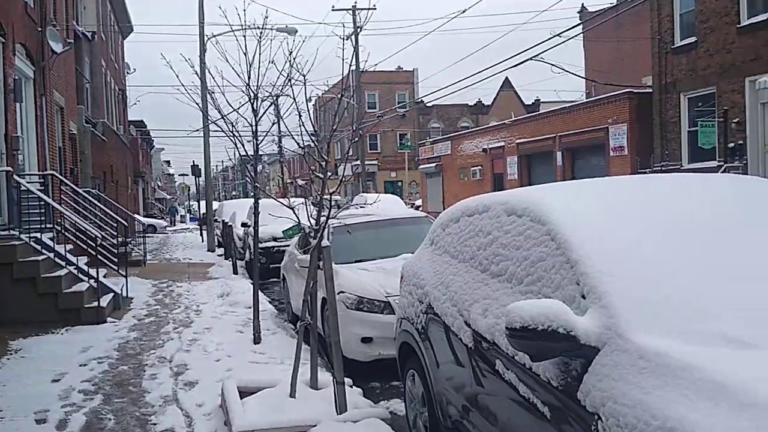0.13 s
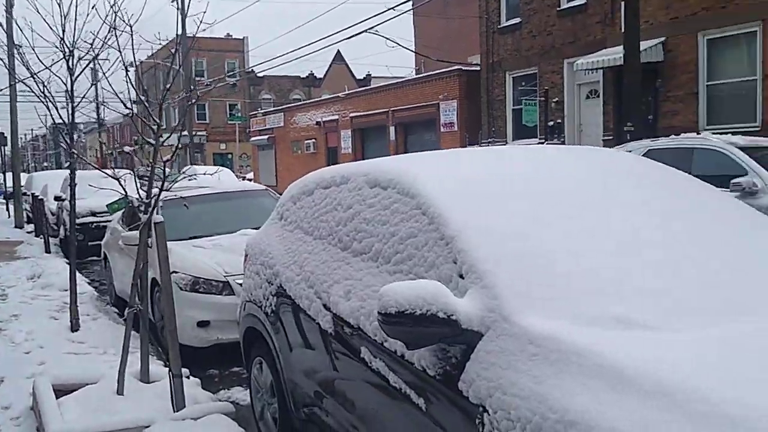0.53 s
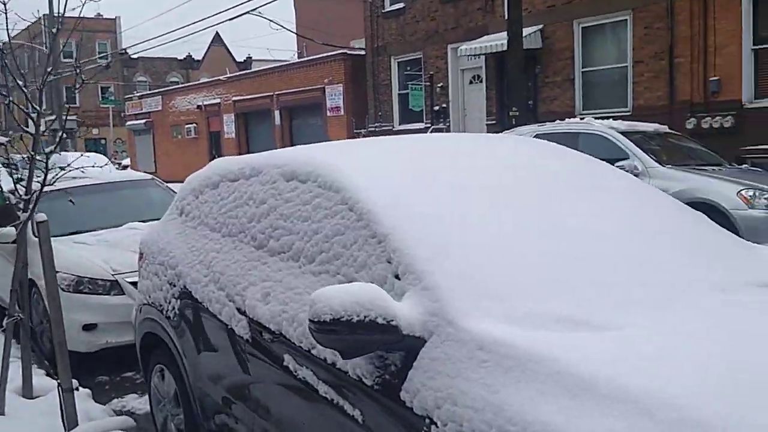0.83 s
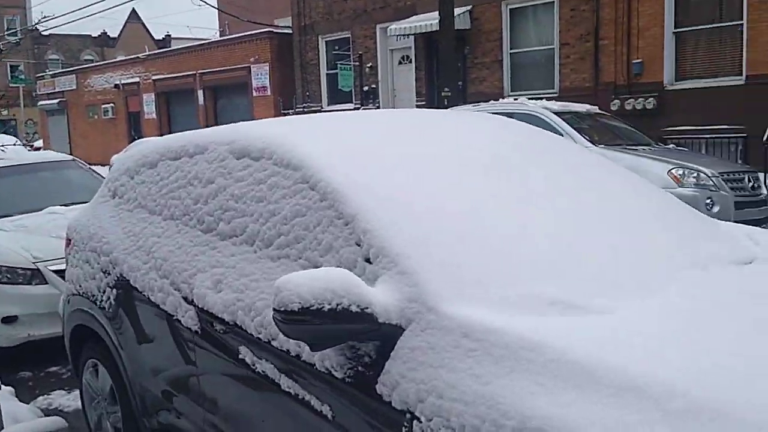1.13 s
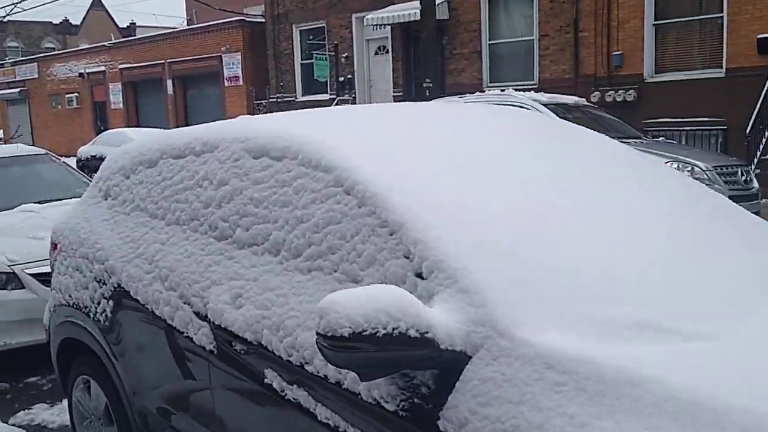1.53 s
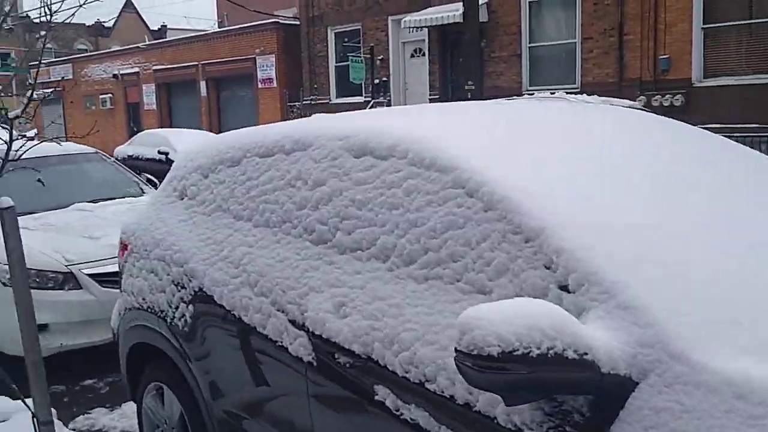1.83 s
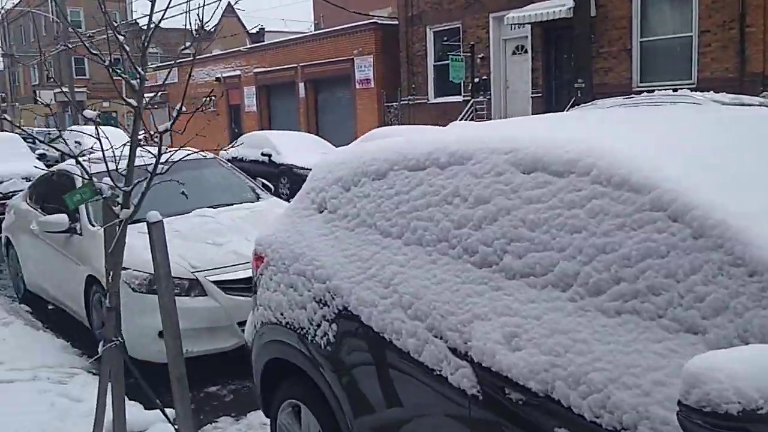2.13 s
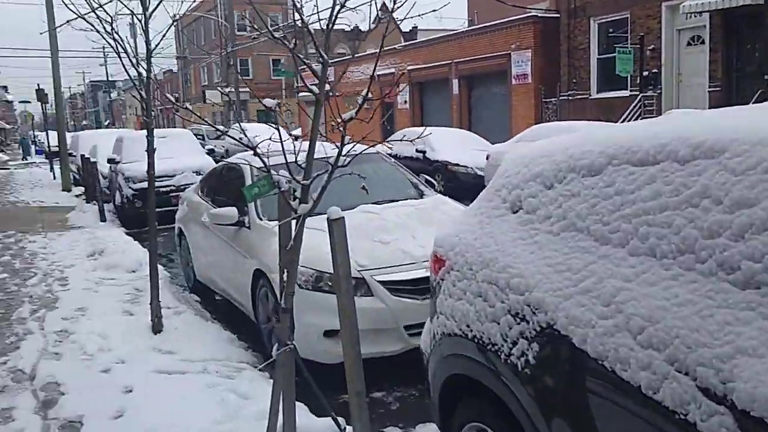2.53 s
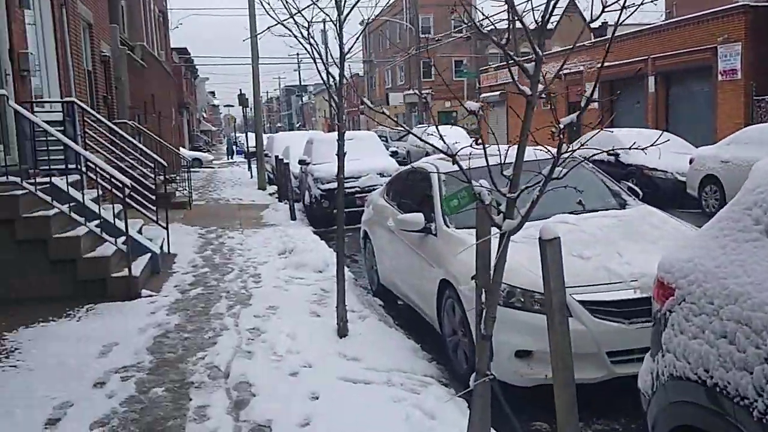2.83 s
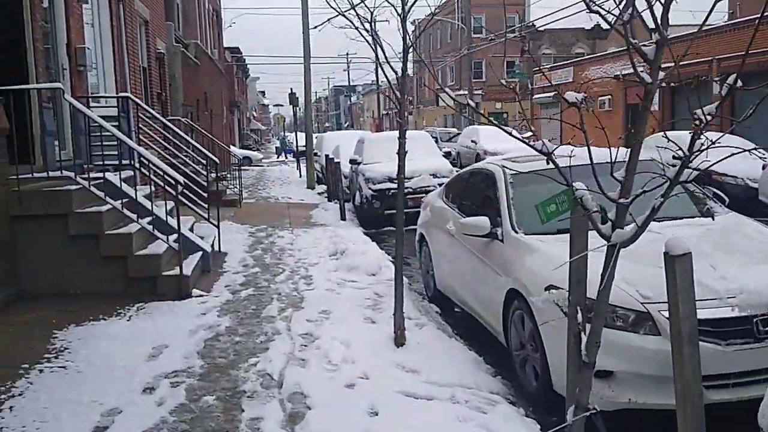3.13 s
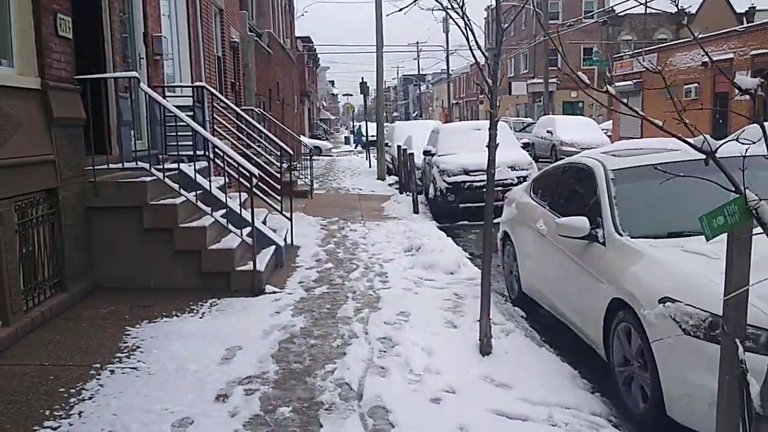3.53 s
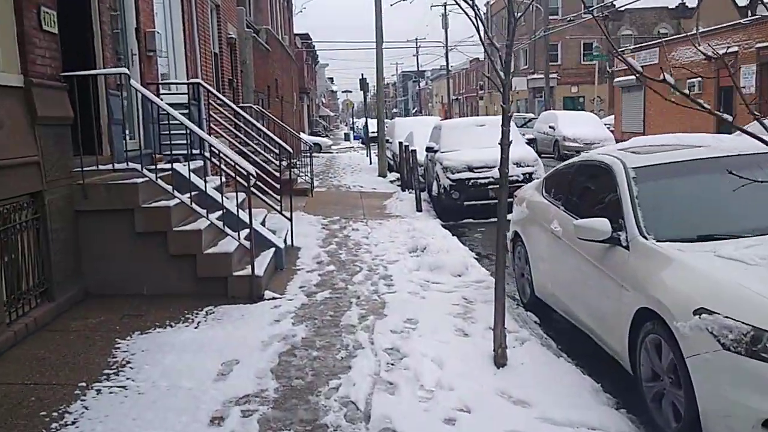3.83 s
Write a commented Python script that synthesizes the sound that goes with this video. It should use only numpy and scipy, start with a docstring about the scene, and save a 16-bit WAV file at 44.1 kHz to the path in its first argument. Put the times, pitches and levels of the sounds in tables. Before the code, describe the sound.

Footsteps crunch through wet snow close to the microphone, seven steps in four seconds, each with a fine sizzle and small snaps. Distant traffic rumbles throughout. Wind buffets mainly the right side, with low thumps from about 1.3 to 3.4 seconds. Sparrows chirp faintly on the right at 0.2 and 1.2 seconds, and one scolds from 3.4 to 3.8 seconds. Clothing rustles very faintly between steps.

```python
"""A city pavement in wet snow, boots close to a stereo pair. From the start far traffic rumbles and
wind buffets mainly the right microphone. Someone takes seven steps in four seconds: each heel splashes
into the crystals, the sole rolls on with a fine sizzle, and the packed snow crunches and snaps.
Sparrows chirp after the first step and around the third; from then on single eddies thump the
microphone, and near the end a sparrow scolds."""
import sys
import numpy as np
from scipy import signal
from scipy.fft import rfft, irfft
from scipy.io import wavfile
from scipy.ndimage import uniform_filter1d

SR = 44100
rng = np.random.default_rng(int(sys.argv[2]) if len(sys.argv) > 2 else 0)


def generate_wav(signal):
    """Clip the signal to [-1, 1] and save it as 16-bit WAV at the path in sys.argv[1]."""
    frames = np.transpose(np.atleast_2d(signal))
    scaled = np.clip(frames, -1, 1) * 32767
    pcm = np.round(scaled).astype(np.int16)
    wavfile.write(sys.argv[1], SR, pcm)


N = 176400
T = np.arange(N) / SR
BIN_HZ = np.arange(N // 2 + 1) * SR / N
SNOW_TOP_HZ, WIND_LEFT_DB, BIRD_PAN_DB = 2230, -21.5, -9.5

# The footfalls. Each row: start in seconds, heel level in dB, sole delay and hold in seconds,
# sole level and its fade over the hold in dB, release in seconds, treble tilt in dB.
STEPS = [(0.017, -46.5, 0.017, 0.083, -48.5, 3, 0.057, 5.5),
         (0.567, -54.5, 0.037, .17, -45.5, 6, 0.016, 2.5),
         (1.306, -50.5, 0.035, 0.026, -50.5, -0.5, .065, 2.5),
         (1.869, -37.5, 0.023, 0.021, -38, 2.5, 0.051, 3), (2.55, -47, 0.044, 0.015, -48, 0.5, 0.053, 0.5),
         (3.1324, -36.5, 0.062, .1, -47.5, 3.5, 0.02, 2),
         (3.818, -48.5, 0.018, 0.052, -46.5, 1.5, 0.052, 2.5)]
# Where close and far sounds sit across the pair. Each row: frequency in Hz, left minus right in dB.
CLOSE_BALANCE = [(500, 0), (2000, -5), (3300, -1), (5500, -10.5), (7500, -9), (9500, -4), (12000, 4),
                 (15000, 13)]
FAR_BALANCE = [(80, -2.5), (500, 3), (2000, -4.5), (3300, -2.5), (5500, -5.5), (9000, 0), (14000, 6.5)]


def from_db(db):
    """Decibels to gain."""
    return 10 ** (np.asarray(db) / 20)


def rms_one(x):
    """Scale to unit power."""
    return x / np.sqrt(np.mean(x ** 2) + 1e-20)


def pan(db):
    """Left and right gains for a level difference."""
    return from_db(np.array([[.5], [-.5]]) * db)


def in_time(rows):
    """A curve at every sample."""
    return np.interp(T, *np.transpose(rows))


def per_bin(points):
    """A table over log frequency at every spectral bin."""
    hz, values = np.transpose(points)
    return np.interp(np.log(BIN_HZ + 1), np.log(hz), values)


def coloured(x, points):
    """Causal (minimum-phase) filter with the given colour and unit power gain."""
    cepstrum = irfft(np.log(rms_one(from_db(per_bin(points)))), N)
    fold = np.concatenate([[1], np.full(N // 2 - 1, 2), np.zeros(N // 2)])
    return irfft(rfft(x) * np.exp(rfft(cepstrum * fold)), N)


def balanced(x, points):
    """Share each frequency between the two microphones, keeping the power."""
    gains = pan(per_bin(points))
    return irfft(rfft(x) * gains / np.sqrt(np.mean(gains ** 2, axis=0)), N)


def envelope(start, attack, hold, release, fade_db=0):
    """Straight attack, hold sinking by fade_db, exponential release; times in seconds."""
    t = T - start
    rise = np.clip(t / attack, 0, 1)
    sink = from_db(-fade_db * np.clip((t - attack) / hold, 0, 1))
    return rise * sink * np.exp(-np.clip((t - attack - hold) / release, 0, 20))


def grains(per_s, spread_db, size=N):
    """Random clicks of uneven size, unit power."""
    sizes = from_db(spread_db * np.minimum(rng.exponential(1, size), 4))
    return rms_one(sizes * rng.choice([-1, 1], size) * (rng.random(size) < per_s / SR))


def lowpass(x, hz):
    """Second-order low-pass."""
    return signal.sosfilt(signal.butter(2, hz, fs=SR, output="sos"), x)


def street():
    """Far traffic: a rumble common to both microphones under diffuse hiss."""
    # The traffic's spectrum. Each row: frequency in Hz, relative level in dB.
    colour = [(25, -18), (45, 5.5), (75, 10), (110, -0.5), (200, -5.5), (400, -8), (700, -10.5),
              (1200, -17.5), (2000, -13), (2700, -20), (4000, -21), (5500, -30.5), (8500, -38),
              (13000, -33.5), (15800, -39)]
    # How alike the microphones hear it. Each row: frequency in Hz, left-right correlation.
    likeness = [(60, 0.73), (300, 1), (700, 0.43), (1500, 0), (3000, 0.031), (15000, 0.19)]
    # Its rise and fall. Each row: time in seconds, level in dB.
    level = [(0, -50), (.4, -53), (.9, -51.5), (1.12, -55), (1.5, -51.5), (1.85, -53), (2.2, -53.5),
             (2.5, -51), (2.9, -51), (3.4, -51), (3.75, -58), (4, -51)]
    mid, side = rfft(rng.standard_normal((2, N)))
    alike = per_bin(likeness)
    air = irfft(np.sqrt(1 + alike) * mid + np.sqrt(1 - alike) * side * [[1], [-1]], N)
    return from_db(in_time(level)) * rms_one(balanced(coloured(air, colour), FAR_BALANCE))


def wind():
    """Slow eddies at each microphone port, and faster buffeting in the gusts."""
    # Spectra of the slow and the fast eddies. Each row: frequency in Hz, relative level in dB.
    slow_colour = [(20, -26.5), (32, -55), (48, -7), (62, -2.5), (80, 0.5), (115, -6.5), (170, -14.5),
                   (250, -31.5), (500, -37.5), (1500, -70)]
    fast_colour = [(40, -13.5), (90, 2), (140, 0.5), (200, 1), (300, -7.5), (450, -24.5), (900, -25.5),
                   (3000, -61.5)]
    # Their strength as gusts pass. Each row: time in seconds, relative level in dB.
    slow_level = [(0.0, -39.5), (0.21, -41.5), (0.33, -69), (0.56, -42.5), (0.66, -59), (0.71, -40),
                  (1.15, -58), (1.2, -41.5), (1.28, -59), (1.31, -43), (1.44, -41), (1.47, -69),
                  (1.49, -48.5), (1.77, -44.5), (1.78, -50.5), (1.89, -35.5), (2.08, -42), (2.1, -49.5),
                  (2.88, -38), (3.01, -48.5), (3.17, -43), (3.45, -41.5), (3.51, -61), (3.81, -84),
                  (3.89, -52), (4.0, -51)]
    fast_level = [(0.0, -44), (0.39, -87), (0.6, -48), (1.26, -79), (1.35, -44), (1.45, -61), (1.57, -47.5),
                  (1.67, -69), (1.7, -46), (1.8, -60), (1.83, -42.5), (1.94, -44), (2.08, -47.5),
                  (2.12, -64), (2.82, -44.5), (2.91, -46.5), (2.99, -63), (3.01, -55), (3.09, -62),
                  (3.38, -45), (3.51, -71), (3.77, -90), (3.95, -51), (4.0, -68)]
    boost_db, steady_s = 5, 0.0522
    out = 0
    for colour, level in ((slow_colour, slow_level), (fast_colour, fast_level)):
        eddies = coloured(rng.standard_normal((2, N)), colour)
        running_rms = np.sqrt(uniform_filter1d(eddies ** 2, int(steady_s * SR), axis=1) + 1e-9)
        out += from_db(in_time(level) + boost_db) * eddies / running_rms
    return out * from_db([[WIND_LEFT_DB], [0]])


def sizzle():
    """Wet crystals burst under the heel, then under the rolling sole."""
    # The bursting crystals' spectrum. Each row: frequency in Hz, relative level in dB.
    colour = [(150, -15), (500, 0), (1400, -9), (2000, 6.5), (2600, -4.5), (3400, 2), (4400, -1.5),
              (5500, -1.5), (7300, -3), (8700, -9.5), (12000, -6), (15500, -7.5)]
    # A boot briefly brushes the snow. Each row: start in seconds, level in dB.
    brushes = [(1.179, -63.5), (1.822, -61.5), (1.978, -79), (2.05, -62), (3.009, -45.5)]
    contact_s, shortest_swell_s = 0.0049, 0.022
    clump_db, clump_hz, tilt_hz = 2.1, 87, 8400
    crystals = np.array([grains(per_s=5000, spread_db=2) for _ in range(2)])
    crystals = rms_one(crystals + 0.91 * rng.standard_normal((2, N)))  # hiss smooths the clicks
    clumps = rms_one(from_db(clump_db * rms_one(lowpass(rng.standard_normal(N), clump_hz))))
    fine = balanced(coloured(crystals * clumps, colour), CLOSE_BALANCE)
    dull = irfft(rfft(fine) / (1 + (BIN_HZ / tilt_hz) ** 4), N)
    treble = fine - dull
    out = fine * sum(from_db(db) * envelope(start, contact_s, hold=0.0043, release=0.0013)
                     for start, db in brushes)
    for start, heel_db, delay, hold, sole_db, fade_db, release, tilt_db in STEPS:
        heel = from_db(heel_db) * envelope(start, contact_s, hold=0.011, release=0.008)
        swell = max(delay, shortest_swell_s)
        sole = from_db(sole_db) * envelope(start, swell, hold, release, fade_db)
        sole *= np.clip((T - start) / swell, 0, 1)  # a second ramp eases the sole in
        tilted = dull * from_db(-tilt_db / 2) + treble * from_db(tilt_db / 2)
        out += np.hypot(heel, sole) * tilted
    return out


def stray_crystals():
    """Lone ice crystals crack while the snow settles under each step."""
    # The cracks' spectrum. Each row: frequency in Hz, relative level in dB.
    colour = [(500, -27), (2000, 12), (4000, -5), (7000, -1), (9000, -2), (13000, 3), (15500, 8.5)]
    below_sole_db = 17
    level = sum(from_db(sole_db - below_sole_db) * envelope(start, delay, hold, release=0.099)
                for start, _, delay, hold, sole_db, *_ in STEPS)
    cracks = np.array([grains(per_s=130, spread_db=4) for _ in range(2)])
    return balanced(coloured(level * cracks, colour), CLOSE_BALANCE)


def fractures(hz, size):
    """Random fractures in the snow, each ringing a few cycles at a pitch near hz; unit power."""
    per_s, pitch_count, pitch_ratio = 1500, 7, 1.53
    ring_cycles = 8.9  # to fall 60 dB
    out = 0
    for pitch in hz * np.geomspace(1 / pitch_ratio, pitch_ratio, pitch_count):
        radius = from_db(-60 * pitch / (ring_cycles * SR))
        angle = 2 * np.pi * pitch / SR
        clicks = grains(per_s / pitch_count, spread_db=2, size=size) + 1e-18
        out += signal.lfilter([1, 0, -1], [1, -2 * radius * np.cos(angle), radius ** 2], clicks)
    return rms_one(lowpass(out, SNOW_TOP_HZ))


def crunch():
    """Coarse fractures run through the snow as it packs, amid duller crumbling."""
    # Snow packs under the weight, mostly higher in pitch as a step goes on.
    # Each row: middle of the swell in seconds, length in seconds, level in dB, pitch in Hz.
    packings = [(0.02, .13, -57, 1370), (0.68, 0.036, -49.5, 990), (0.736, 0.0062, -46.5, 1390),
                (0.754, 0.019, -45, 1410), (1.342, 0.054, -53.5, 1050), (1.873, 0.026, -48.5, 1410),
                (1.919, 0.097, -56, 1360), (2.587, 0.067, -50.5, 1440), (3.184, 0.011, -46, 700),
                (3.205, .04, -51, 1180), (3.257, 0.044, -57, 1280), (3.85, 0.028, -47.5, 810),
                (3.884, 0.033, -49, 1380), (3.936, 0.038, -48.5, 1700)]
    # The crumbling's spectrum. Each row: frequency in Hz, relative level in dB.
    colour = [(100, -33), (300, 3.5), (450, 4.5), (750, -14.5), (1300, -6.5), (1900, 0.5), (2300, -10.5),
              (2800, -10), (4500, -22.5), (9000, -46)]
    swell_share, mid_db, side_db = 0.34, -5, -7.5
    creak, load = 0, 0
    for onset, length, db, hz in packings:
        swell = swell_share * length
        weight = from_db(db) * envelope(onset - swell / 2, swell, length - swell / 2, release=0.0077)
        creak += weight * np.resize(fractures(hz, size=SR // 4), N)
        load += weight
    mid, side = rng.standard_normal((2, N))
    crumbs = from_db(mid_db) * mid + from_db(side_db) * side * [[1], [-1]]
    return pan(db=-0.5) * (creak + coloured(load * crumbs, colour))


def chirps():
    """Sparrows off to the right give arched, falling chirps."""
    # The calls. Each row: start and length in seconds, pitch and its fall in Hz, level in dB.
    calls = [(0.201, .045, 4120, 150, -62.5), (0.213, 0.046, 5450, 302, -68),
             (.24, 0.048, 3690, 204, -66.5), (1.2, 0.035, 5540, 100, -69), (1.226, 0.036, 5350, 350, -71)]
    arch_hz, wobble_hz = 257, 147
    out = 0
    for start, length, hz, fall_hz, db in calls:
        progress = np.clip((T - start) / length, 0, 1)
        arch = np.sin(np.pi * progress)
        wobble = rms_one(lowpass(rng.standard_normal(N), hz=600))
        pitch = hz - fall_hz * progress + arch_hz * (arch - .5) + wobble_hz * wobble
        out += from_db(db) * np.sqrt(2) * arch * np.sin(2 * np.pi * np.cumsum(pitch) / SR)
    return pan(BIRD_PAN_DB) * out


def knock(t, hz, cycles):
    """A damped ring that falls 60 dB in the given number of cycles."""
    return np.sin(2 * np.pi * hz * t) * from_db(-60 * np.minimum(t * hz / cycles, 2))


def snaps():
    """A lump of snow breaks: its own knock, the boot's under it, and a short crumbling tail."""
    # Single lumps give way. Each row: start in seconds, relative level in dB, pitch in Hz.
    breaks = [(.583, -24.5, 1110), (.742, -32, 1350), (0.77, -32, 1410), (1.183, -38, 1300),
              (1.588, -39, 1290), (1.653, -50.5, 696), (1.825, -39, 636), (1.8766, -31, 650),
              (1.8797, -26, 1560), (1.979, -30.5, 1200), (1.983, -25.5, 1450), (2.095, -40, 1160),
              (2.463, -47, 870), (3.009, -32, 469), (3.018, -33.5, 1410), (3.189, -39, 680),
              (3.6, -51, 895), (3.869, -32.5, 830), (3.933, -30.5, 1540), (3.949, -26, 1604),
              (3.963, -41, 1710)]
    boot_db, tail_db, tail_s = -4.5, -19.5, 0.004
    rise_s, bottom_hz = 0.00033, 255
    out = 0
    for start, db, hz in breaks:
        t = np.maximum(T - start, 0)
        lump = knock(t, hz, cycles=5.2)
        boot = from_db(boot_db) * knock(t, hz=407, cycles=2.56)
        tail = (t > 0) * np.exp(-np.minimum(t / tail_s, 20))
        crumbs = 2 * from_db(tail_db) * rng.standard_normal((2, N)) * tail
        out += 2 * from_db(db) * (lump + boot + crumbs) * np.minimum(t / rise_s, 1)
    out = signal.sosfilt(signal.butter(2, bottom_hz, "high", fs=SR, output="sos"), out)
    return pan(db=0.5) * lowpass(out, SNOW_TOP_HZ)


def rustles():
    """A faint high rustle close by, likely the coat."""
    # Rustles between the steps. Each row: start and hold in seconds, level in dB.
    swishes = [(.8, 0.099, -84), (1.63, 0.23, -69), (2.8, 0.21, -65.5), (3.32, 0.5, -72)]
    # Their spectrum. Each row: frequency in Hz, relative level in dB.
    colour = [(2000, -21), (4200, 7), (6000, -2), (9000, -8), (12500, 2), (15500, 6)]
    edge_s = 0.022
    level = sum(from_db(db) * envelope(start, edge_s, hold, edge_s) for start, hold, db in swishes)
    return level * balanced(coloured(rng.standard_normal((2, N)), colour), CLOSE_BALANCE)


def thumps():
    """An eddy passes the microphone port as one or two slow pressure swings."""
    # Single eddies. Each row: centre in seconds, level in dB, pitch in Hz.
    eddies = [(1.35, -27, 132), (1.562, -31.5, 193), (1.71, -28, 140), (1.758, -26, 114), (1.952, -23, 148),
              (2.793, -23, 124), (2.87, -28, 105), (2.905, -46, 180), (3.384, -36.5, 168)]
    width_cycles = 0.52
    out = 0
    for centre, db, hz in eddies:
        cycles = (T - centre) * hz
        bell = np.exp(-np.minimum((cycles / width_cycles) ** 2 / 2, 20))
        out += from_db(db) * np.sin(2 * np.pi * cycles) * bell
    return out * from_db([[WIND_LEFT_DB], [0]])


def chatter():
    """A sparrow scolds off to the right: two rough gliding voices over a rasp."""
    # The harsh notes. Each row: start and length in seconds, lower and upper pitch in Hz,
    # glide in octaves, level in dB.
    notes = [(3.415, 0.034, 3125, 5760, -.17, -53.5), (3.463, 0.024, 2950, 5300, 0.033, -55.5),
             (3.483, 0.023, 3300, 5100, 0.066, -60.5), (3.538, 0.019, 3050, 5400, .05, -58.5),
             (3.55, 0.046, 3740, 4860, 0.018, -60.5), (3.606, 0.052, 3010, 5400, 0.02, -60),
             (3.721, 0.05, 2400, 5200, 0.041, -61.5)]
    # The rasp's spectrum. Each row: frequency in Hz, relative level in dB.
    colour = [(1200, -27), (2300, 3), (3100, 3), (4100, -4), (5200, 7), (6200, -2.5), (8500, -11),
              (13000, -12.5), (16000, -16)]
    roughness_hz, upper_db, rasp_db = 180, -8, -2.5
    rough = rms_one(lowpass(rng.standard_normal((2, 2, N)), roughness_hz))
    rasp = from_db(rasp_db) * balanced(coloured(rng.standard_normal((2, N)), colour), FAR_BALANCE)
    out = 0
    for start, length, lower_hz, upper_hz, glide, db in notes:
        progress = np.clip((T - start) / length, 0, 1)
        phase_per_hz = 2 * np.pi * np.cumsum(2 ** (glide * (progress - .5))) / SR
        lower = rough[0] * np.sin(lower_hz * phase_per_hz)
        upper = from_db(upper_db) * rough[1] * np.sin(upper_hz * phase_per_hz)
        level = from_db(db) * envelope(start, attack=0.012, hold=length / 2, release=0.023)
        out += level * (pan(BIRD_PAN_DB) * (lower + upper) + rasp)
    return out


def reflected(x):
    """Add short reflections from pavement, body and parked cars, keeping the power."""
    # The bounces. Each row: delay to the left and to the right microphone in seconds, gain.
    bounces = [(.0023, .0021, 0.088), (.0037, 0.0028, .2), (.0083, .0097, 0.21)]
    out = x.copy()
    for left, right, gain in bounces:
        for channel, delay in enumerate((left, right)):
            lag = round(delay * SR)
            out[channel, lag:] += gain * x[channel, :N - lag]
    return out / np.sqrt(1 + sum(gain ** 2 for _, _, gain in bounces))


def scene():
    """Boots close by, wind on the microphone, the street behind."""
    pavement = reflected(sizzle() + stray_crystals() + crunch() + rustles() + street() + chatter())
    return pavement + snaps() + wind() + thumps() + chirps()


def record(dry):
    """The top is cut steeply."""
    cutoff_hz = 15900
    return signal.sosfilt(signal.ellip(12, .1, 70, cutoff_hz, fs=SR, output="sos"), dry)


dry = scene()
out = record(dry)
generate_wav(out)
```